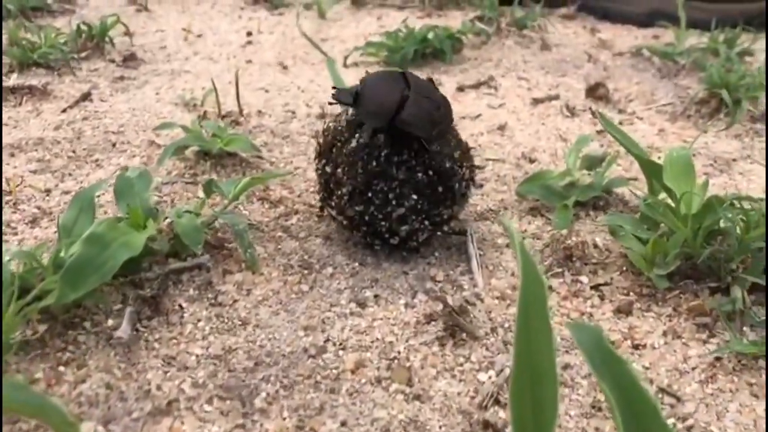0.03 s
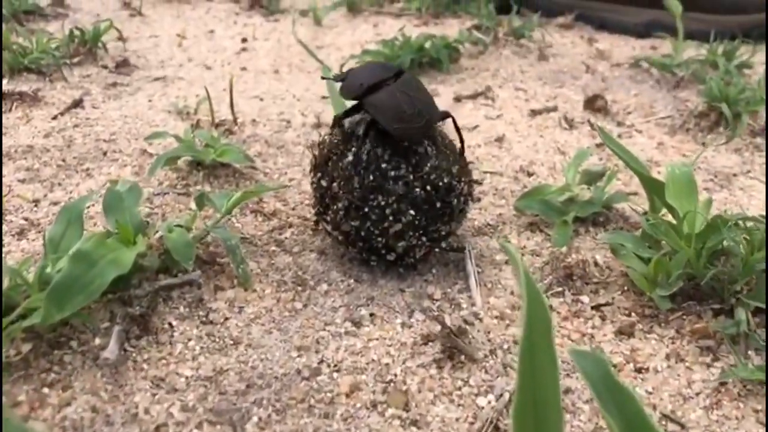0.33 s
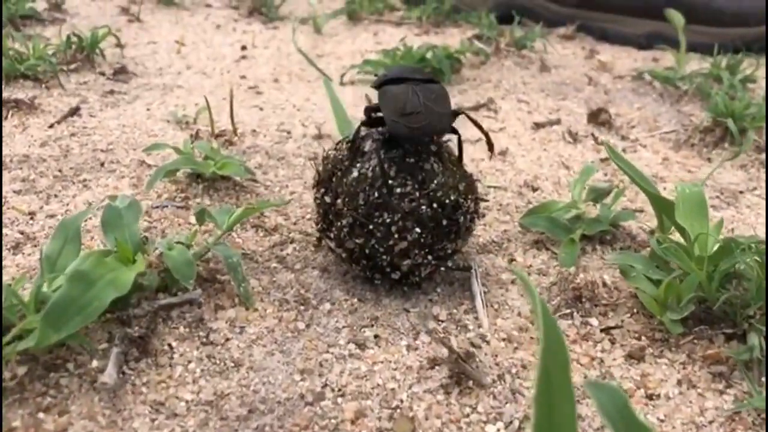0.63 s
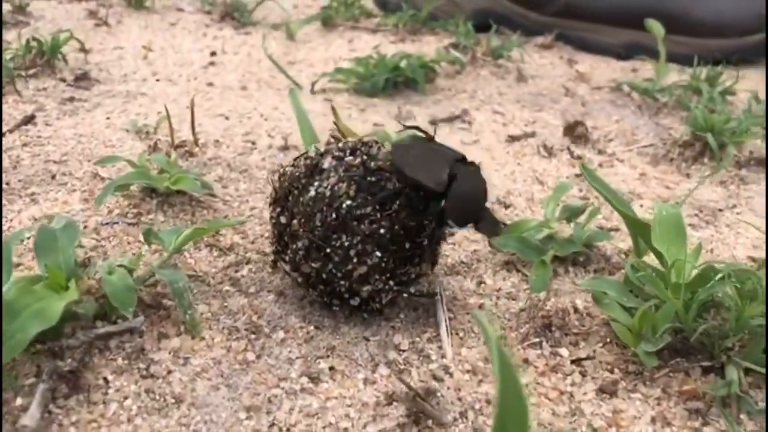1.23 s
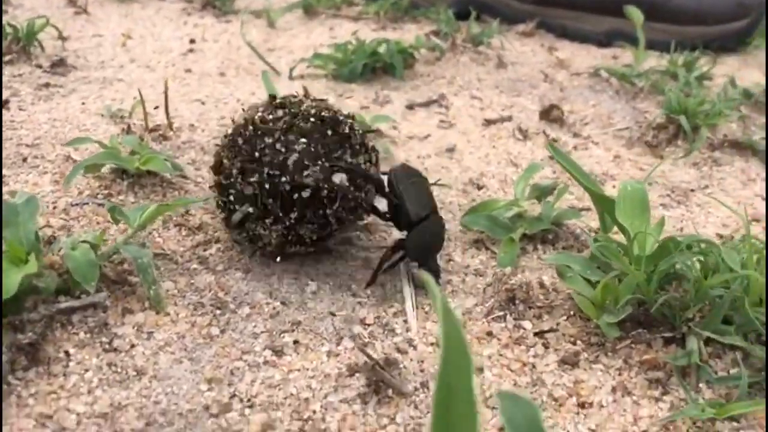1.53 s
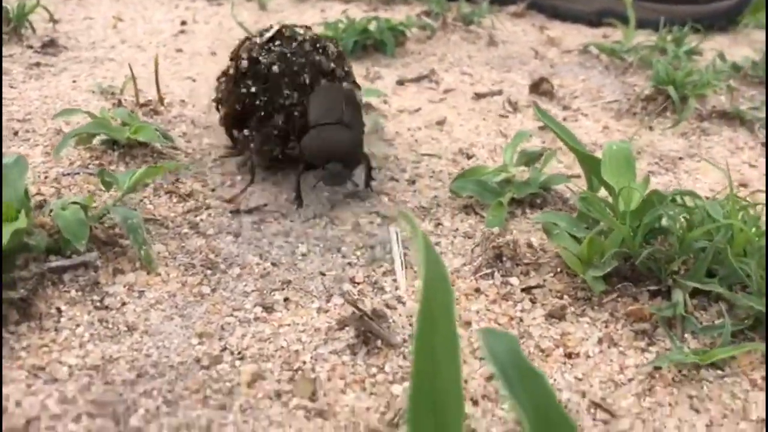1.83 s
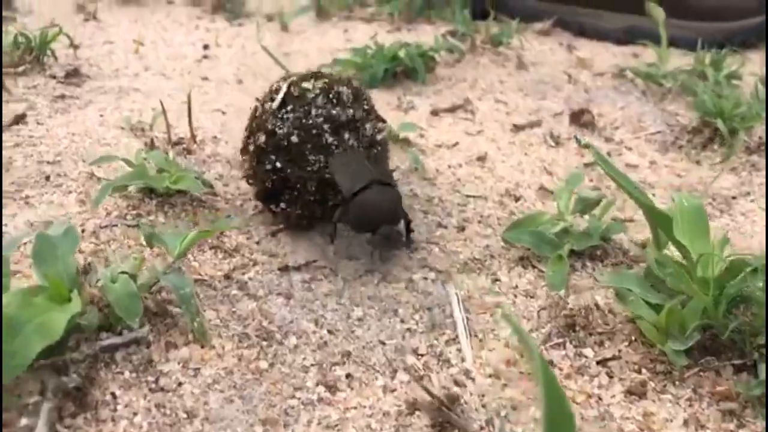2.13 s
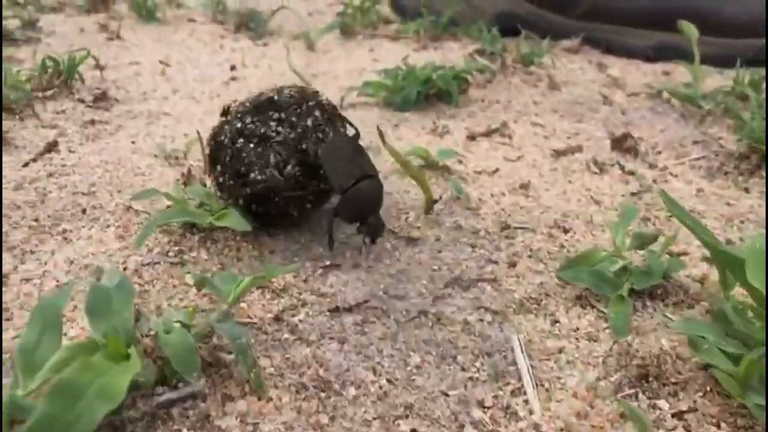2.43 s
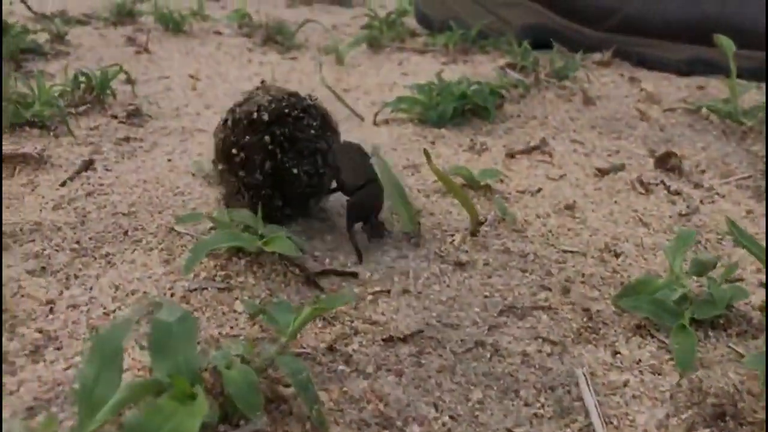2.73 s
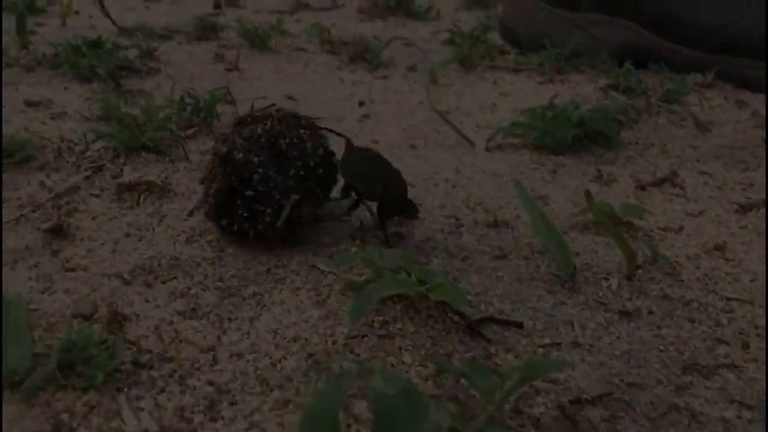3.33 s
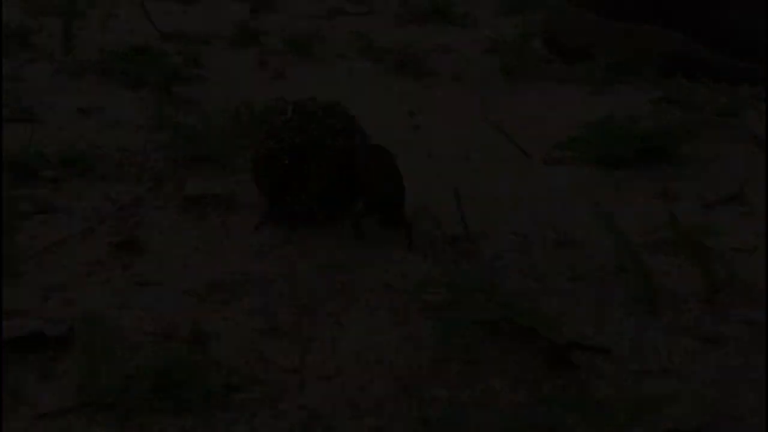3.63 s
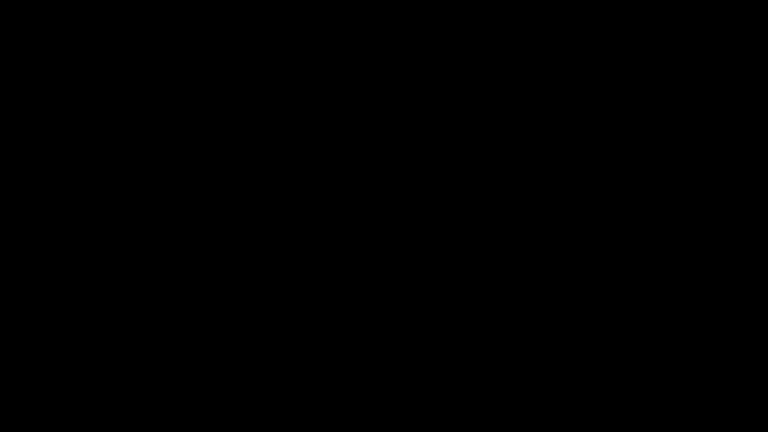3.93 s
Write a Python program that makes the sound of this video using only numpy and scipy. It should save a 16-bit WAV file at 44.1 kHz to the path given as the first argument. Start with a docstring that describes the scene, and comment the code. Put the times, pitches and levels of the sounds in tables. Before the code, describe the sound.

A thin, high insect buzz swells and fades outdoors while a gust rumbles on a microphone near the ground. Sand softly crackles and sifts under a beetle rolling its ball, before the wind thumps again.

```python
"""Dung beetle on windy sand

Low over open ground, sand and dry bits crackle as a dung beetle rolls its ball: clumps of grain
contacts over a soft sifting hiss. An unseen insect makes a rapid buzz of falling chirps near 8 kHz,
swelling about twice a second. Two gusts buffet the microphone with eddies. Behind it all lie still
air, faint calls and a far insect chorus. The sound stops dead shortly before the end."""
import sys
import numpy as np
from scipy import signal
from scipy.fft import rfft, irfft, next_fast_len
from scipy.io import wavfile
from scipy.ndimage import uniform_filter1d, map_coordinates

SR = 44100
rng = np.random.default_rng(int(sys.argv[2]) if len(sys.argv) > 2 else 0)


def dump(signal):
    """Clip the signal to [-1, 1] and save it as 16-bit WAV at the path in sys.argv[1]."""
    limited = np.clip(np.atleast_2d(signal).T, -1, 1)
    pcm = np.round(limited * 32767).astype(np.int16)
    wavfile.write(sys.argv[1], SR, pcm)


N = 176400


def insect():
    """Each chirp falls through an upper then a lower part, with side tones; plants scatter the buzz."""
    # The chirp's parts, lower one listed first. Each row: start and length as shares of a cycle,
    # level in dB, lower side tone in dB, upper side tone in dB.
    parts = [(.42,.86,2,-12,-5),(.86,.95,1.5,-9,-10)]
    # Their glides. Each row: midpoint pitch in Hz, fall in Hz.
    glides = [(7895,200),(8225,320)]
    # The song's swells. Each row: time in seconds, level in dB.
    swells = [(0,-66.5),(.1,-67.5),(.38,-63),(.66,-73.5),(.8,-68.5),(.94,-59),(1.12,-71),(1.32,-74),(1.52,-58.5),(1.66,-68.5),(2.0,-68.5),(2.24,-73),(2.5,-66.5),(2.88,-74),(3.0,-80),(3.39,-74),(3.47,-68),(3.72,-62)]
    # Fader on both side tones. Each row: time in seconds, gain in dB.
    side_fader = [(0,1),(.4,0.5),(.93,-6),(1.25,-4),(1.6,4.5),(2.0,3.5),(2.5,-0.5),(3.7,-6)]
    # Accent on the upper part. Each row: time in seconds, gain in dB.
    upper_accent = [(0,-3),(.4,-2.5),(.93,-3),(1.5,-7),(2.05,-4),(2.5,0.5),(3.0,1.5),(3.7,-5)]
    chirps_per_s, spacing_hz, closing_hz, drift_hz = 33.9, 978, 220, 26
    scatter_db, scatter_t60_s = -4.5, .06
    t = np.arange(N) / SR
    cycles = chirps_per_s * t + .06 * wobble(5)
    side = amp(curve(side_fader))
    accents = (0, curve(upper_accent))
    song = np.zeros(N)
    for part, (hz, fall_hz), accent_db in zip(parts, glides, accents):
        start, length, db, below_db, above_db = part
        progress = np.clip((cycles - start) % 1 / length, 0, 1)
        envelope = np.sin(np.pi * progress)
        pitch = hz + fall_hz * (.5 - progress) + drift_hz * wobble(30)
        # The side tones close in as each part falls.
        spacing = spacing_hz + closing_hz * (.5 - progress) + drift_hz * wobble(30)
        for offset, gain in ((0, 1), (-spacing, side * amp(below_db)), (spacing, side * amp(above_db))):
            rasp = .28 * wobble(260)
            phase = 2 * np.pi * np.cumsum(pitch + offset) / SR + rasp
            level = amp(db + accent_db + 1.8 * wobble(45))
            song += gain * level * envelope * np.sin(phase)
    song *= amp(curve(swells))
    tail = (rng.standard_normal(N) * amp(-60 * t / scatter_t60_s))[:SR // 4]
    scattered = signal.fftconvolve(song, tail / np.linalg.norm(tail))[:N]
    return song + amp(scatter_db) * scattered


def crackles():
    """Dry bits crackle in short, dying clumps; single grains snap between them."""
    # Crunches of dry bits. Each row: start in seconds, level in dB, centre in Hz,
    # width in octaves, seconds to fall 40 dB.
    crunches = [(.726,-54.5,1480,0.45,0.017),(1.32,-51.5,3000,1.1,.012),(1.419,-32,1110,1,0.0055),(1.4195,-29,3300,1.1,0.0038),(1.442,-39.5,3300,0.82,.0045),(1.489,-43,4800,0.82,.0082),(1.514,-40,4600,1.5,0.0099),(1.631,-46.5,9500,0.78,.022),(1.717,-49,7700,1.2,0.014),(1.8814,-48,4100,0.9,0.022),(1.9189,-50.5,2720,0.59,0.018),(2.021,-37,5900,1.5,0.007),(2.0373,-47.5,3650,1,0.02),(2.0714,-41.5,4050,0.51,.012),(2.1021,-45.5,4000,1.2,0.013),(2.126,-46,3700,0.93,0.011),(2.146,-50.5,2500,0.8,0.023),(2.152,-53,3300,0.32,0.026),(2.2568,-43.5,5530,1.2,0.016),(2.3383,-51,5470,0.69,0.016),(2.4989,-44.5,3940,1.2,.011),(2.709,-45.5,8150,0.58,0.0088),(2.931,-44,4370,1.9,0.0105),(3.0317,-51,5700,.6,0.015),(3.048,-44.5,5760,0.97,0.012),(3.141,-48,5600,1.5,.018),(3.161,-48.5,4400,1.1,0.015),(3.258,-55.5,5340,0.49,0.022),(3.4584,-51.5,5050,1.3,0.021),(3.496,-54.5,2820,.35,.15),(3.615,-42,700,0.26,0.049),(3.638,-39,1200,0.74,0.0081)]
    # Hard grain snaps. Each row: start in seconds, level in dB, centre in Hz.
    snaps = [(1.417,-47,6000),(1.4209,-35,3820),(1.426,-46,6300),(1.4287,-43,6000),(1.524,-44,6600),(1.531,-45,4400),(2.362,-54,3000),(2.518,-51,5000),(2.526,-46,5800),(2.541,-46,8700),(2.559,-45.5,4250),(2.647,-44,5600),(2.664,-50,3900),(2.673,-48,3200),(2.692,-50,4700),(2.728,-43.5,8150),(2.793,-50.5,4100),(2.824,-50.5,2570),(3.151,-57,8500),(3.353,-47.5,4500),(3.685,-47,5300),(3.746,-49.5,4500)]
    crunch_trim_db, snap_trim_db = -2.5, -1.5
    out = np.zeros(N + SR)
    for s, db, hz, octaves, decay_s in crunches:
        crunch = clump(hz, octaves, decay_s, attack_s=.0012, length_s=.128)
        add(out, s, amp(db + crunch_trim_db) * crunch)
    for s, db, hz in snaps:
        add(out, s, amp(db + snap_trim_db) * tick(hz))
    return out[:N]


def clump(hz, octaves, decay_s, attack_s, length_s):
    """Uneven grain contacts in a band around hz, falling 40 dB in decay_s."""
    t = np.arange(int(length_s * SR)) / SR
    contacts = rng.standard_normal(len(t)) * amp(3.5 * rng.standard_normal(len(t)))
    octaves_away = np.log2((np.fft.rfftfreq(len(t), 1 / SR) + 1) / hz)
    grit = unit(irfft(rfft(contacts) * bell(octaves_away, octaves), len(t)))
    return grit * amp(-40 * t / decay_s) * (1 - np.exp(-t / attack_s))


def tick(hz):
    """One hard grain snapping, with a peak of 1."""
    snap = clump(hz, octaves=.75, decay_s=.003, attack_s=.0001, length_s=.006)
    return snap / abs(snap).max()


def sand():
    """Shifting sand: tiny ticks, each with its own pitch, over a soft hiss and duller scuffing."""
    # Faders for the sifting and the scuffing. Each row: time in seconds, level in dB.
    sift_fader = [(0,-87),(.11,-79),(.3,-93),(.57,-87.5),(.95,-78),(1.15,-74),(1.32,-72),(1.4,-75),(1.5,-65.5),(1.58,-73),(1.72,-67.5),(1.87,-67),(1.98,-73.5),(2.1,-64),(2.22,-72),(2.55,-68.5),(2.6,-79),(2.7,-68.5),(2.8,-71.5),(3.05,-68.5),(3.35,-70),(3.75,-69)]
    scuff_fader = [(1.35,-95),(1.5,-69),(1.6,-78),(1.72,-79),(1.83,-67),(1.97,-77.5),(2.12,-72.5),(2.38,-71.5),(2.5,-77.5),(2.62,-82),(2.83,-84),(2.91,-62.5),(2.96,-73),(3.01,-69.5),(3.08,-78.5),(3.44,-74),(3.52,-62.5),(3.64,-72.5),(3.72,-71.5)]
    # EQ of the bright hiss and the midrange scuffing. Each row: frequency in Hz, gain in dB.
    hiss_eq = [(400,2.5),(900,1.5),(2000,-2.5),(3200,0.5),(5000,2),(7000,2),(10000,1.5),(11400,-5.5),(12100,-18)]
    scuff_eq = [(250,-25),(550,4),(800,3.5),(1200,1),(2300,-4),(4500,-29)]
    grains_per_s, grain_hz, spread_octaves, swing_db = 340, 5000, .6, 1.9
    grains = np.zeros(N + SR)
    for s in rng.random(grains_per_s * N // SR) * N / SR:
        size = amp(2.8 * min(rng.exponential(), 3))  # many small grains, a few big ones
        hz = grain_hz * 2 ** rng.normal(0, spread_octaves)
        add(grains, s, size * tick(hz))
    sift_level = amp(curve(sift_fader) + swing_db * wobble(24.5))
    sifting = amp(-4) * unit(grains[:N]) + amp(-3) * noise(hiss_eq)
    scuff_level = amp(curve(scuff_fader) + swing_db * wobble(51))
    return sift_level * sifting + scuff_level * noise(scuff_eq)


def wind():
    """Slow eddies rumble and fast ones flutter on the microphone, each gust a string of puffs."""
    # The gusts, as faders for slow and fast eddies. Each row: time in seconds, level in dB.
    rumble_fader = [(0.02, -38), (0.1, -43.5), (0.14, -52.5), (0.21, -37), (0.24, -40.5), (0.41, -38),
                    (0.75, -47.5), (0.79, -38.5), (0.82, -50.5), (0.85, -41), (0.92, -44), (1.0, -40),
                    (1.02, -36.5), (1.14, -41), (1.16, -38), (1.45, -48.5), (1.47, -39.5), (1.54, -49.5),
                    (1.58, -45), (1.61, -78), (1.68, -50), (1.72, -60), (1.77, -57.5), (1.85, -69.5),
                    (1.96, -53), (2.06, -66.5), (2.55, -65.5), (2.61, -54.5), (2.86, -65.5), (2.91, -47),
                    (2.95, -79), (3.01, -44.5), (3.04, -65), (3.17, -50.5), (3.31, -69.5), (3.42, -45.5),
                    (3.48, -51.5), (3.51, -45), (3.64, -37), (3.77, -47)]
    flutter_fader = [(0.03,-48.5),(0.16,-70),(0.2,-39),(0.24,-65),(0.27,-36),(0.29,-61),(0.38,-47),(0.4,-35),(0.42,-54),(0.47,-37),(0.48,-51),(0.51,-62.5),(0.53,-39.5),(0.57,-71),(0.59,-48),(0.65,-49),(0.69,-57),(0.72,-45),(0.75,-61),(0.8,-47.5),(0.81,-67),(0.86,-40.5),(0.89,-68.5),(1.02,-39),(1.08,-56.5),(1.1,-44),(1.22,-55.5),(1.245,-45),(1.28,-57),(1.44,-62.5),(1.47,-47),(1.51,-65),(3.38,-67.5),(3.41,-51),(3.47,-73),(3.51,-40),(3.54,-37.5),(3.55,-45.5),(3.62,-36),(3.66,-50.5),(3.7,-40),(3.73,-50.5),(3.75,-44.5),(3.77,-67.5)]
    # EQ of the slow and fast eddies. Each row: frequency in Hz, gain in dB.
    rumble_eq = [(20,-38),(31,-14.5),(45,1),(70,6.5),(125,3),(190,-4),(260,-11),(400,-56.5)]
    flutter_eq = [(100,-22.5),(170,-1),(230,-1.5),(320,-6),(430,-14),(550,-21.5),(680,-35.5),(900,-56),(1500,-80)]
    slow_puffs = amp(2.2 * wobble(55))
    rumble = unit(eddies(rumble_eq, span_s=.027) * slow_puffs)
    fast_puffs = amp(3 * wobble(110))
    flutter = unit(eddies(flutter_eq, span_s=.014) * fast_puffs)
    return amp(curve(rumble_fader) + 1) * rumble + amp(curve(flutter_fader) + .5) * flutter


def eddies(eq, span_s):
    """Turbulence whose strength stays even over spans longer than span_s."""
    swirl = noise(eq)
    power = abs(uniform_filter1d(swirl * swirl, int(span_s * SR) + 1))
    return unit(swirl / np.sqrt(power + .033))


def buffets():
    """Tight eddies thump the microphone, each with one or two swings of pressure."""
    # Wind thumps. Each row: midpoint in seconds, envelope peak in dB, centre in Hz.
    thumps = [(0.206,-29,165),(.268,-34.5,190),(.376,-34,145),(0.409,-27.5,178),(0.466,-28.5,204),(0.492,-28,146),(.609,-36,360),(.643,-37,297),(1.027,-25.5,141),(1.054,-30,196),(1.07,-31,70),(1.243,-44,530),(1.248,-31,194),(1.32,-34,128.4),(1.471,-29,142),(3.418,-33,154),(3.536,-41,520),(3.6,-26.5,247),(3.625,-32.5,492),(3.633,-29.5,95),(3.668,-33,70)]
    t, out = np.arange(N) / SR, np.zeros(N)
    for s, db, hz in thumps:
        cycles = (t - s) * hz
        out += amp(db) * bell(cycles, width=.8) * np.sin(2 * np.pi * (cycles + rng.random()))
    return out


def far_calls():
    """Faint narrow-band calls swell and fade in the distance."""
    # High calls. Each row: midpoint in seconds, level in dB, centre in Hz, half length in seconds.
    calls = [(.115,-79,5300,.035),(.15,-77,2550,.006),(.385,-83,5400,.035)]
    t, out = np.arange(N) / SR, np.zeros(N)
    for s, db, hz, half_s in calls:
        voice = unit(filtered(rng.standard_normal(N), lambda f: bell(f - hz, width=370)))
        out += amp(db) * bell(t - s, half_s) * voice
    return out


def air_and_chorus():
    """A gently wavering bed of still air and far insects."""
    # EQ of the low hush and the high chorus. Each row: frequency in Hz, gain in dB.
    air_eq = [(22,-7.5),(45,-0.5),(200,-5.5),(400,-2),(700,-8),(1200,-14.5),(2500,-22.5),(6000,-24),(9000,-34),(11000,-51.5)]
    chorus_eq = [(5500,-24.5),(6600,-12.5),(6900,-2),(7300,2.5),(7650,0),(8400,-0.5),(8900,0.5),(9300,-6.5),(9700,-32),(11000,-47)]
    air_db, chorus_db = -65, -72
    air = amp(air_db + .99 * wobble(5.1)) * noise(air_eq)
    chorus = amp(chorus_db + wobble(12)) * noise(chorus_eq)
    return air + chorus


def amp(db):
    """Decibels to gain."""
    return 10 ** (np.asarray(db) / 20)


def unit(x):
    """Scale to rms 1."""
    return x / np.sqrt(np.mean(x ** 2) + 1e-20)


def bell(x, width):
    """A Gaussian hump, 1 at x = 0; width is its standard deviation."""
    return np.exp(-.5 * (x / width) ** 2)


def curve(rows):
    """Rows of seconds and value, joined into one value per sample."""
    return np.interp(np.arange(N) / SR, *np.transpose(rows))


def wobble(rate):
    """A smooth random curve, rate knots a second."""
    return map_coordinates(rng.standard_normal(N // 8), [np.arange(N) * rate / SR], mode="mirror")


def filtered(x, response):
    """Filter x by a gain given as a function of Hz."""
    size = next_fast_len(len(x) + 8192)
    return irfft(rfft(x, size) * response(np.fft.rfftfreq(size, 1 / SR)), size)[:len(x)]


def noise(eq):
    """Noise of rms 1, coloured by rows of Hz and dB."""
    knots_hz, db = np.transpose(eq)
    white = rng.standard_normal(N)
    return unit(filtered(white, lambda hz: amp(np.interp(np.log(hz + 1), np.log(knots_hz + 1), db))))


def add(out, s, sound):
    """Mix a sound into out at s seconds."""
    out[round(s * SR):][:len(sound)] += sound


def scene():
    """All layers mixed at one low microphone."""
    return (wind() + buffets() + insect() + crackles() + sand() + air_and_chorus() + far_calls())[None]


def record(dry):
    """A quick fade in, a dead stop and a steep cut of the top treble."""
    stop_s, fade_s, top_hz = 3.78, .004, 11900
    t = np.arange(N) / SR
    gate = np.clip(np.minimum(t, stop_s - t) / fade_s, 0, 1)
    return filtered(dry[0] * gate, lambda hz: hz < top_hz)[None]


dry = scene()
out = record(dry)
dump(out)
```